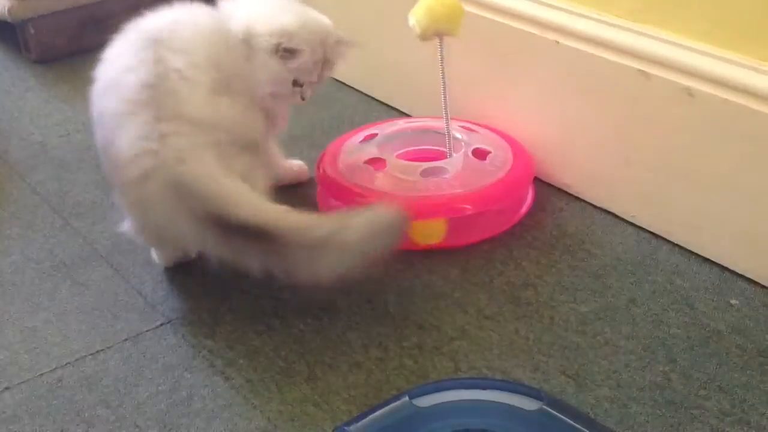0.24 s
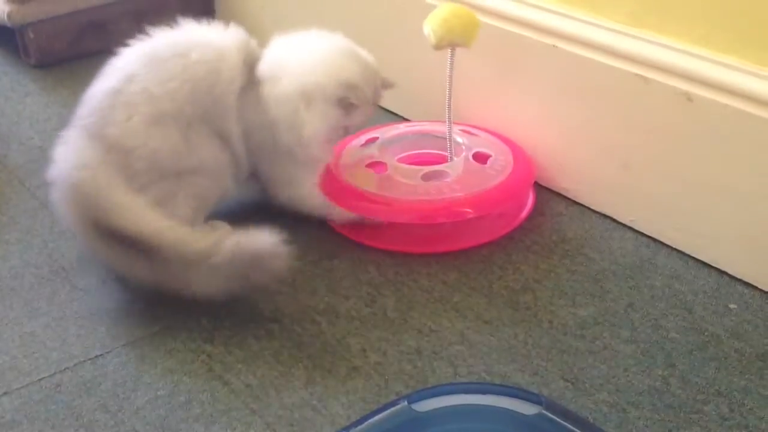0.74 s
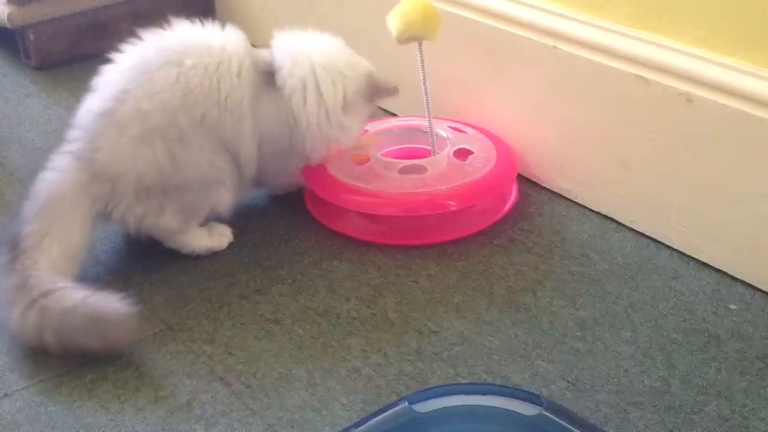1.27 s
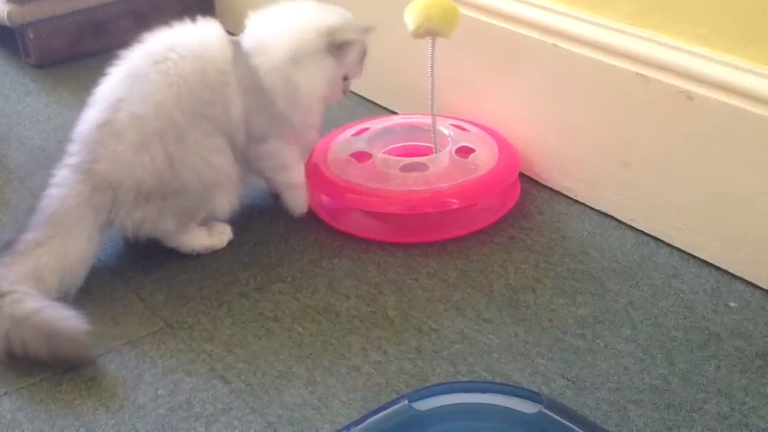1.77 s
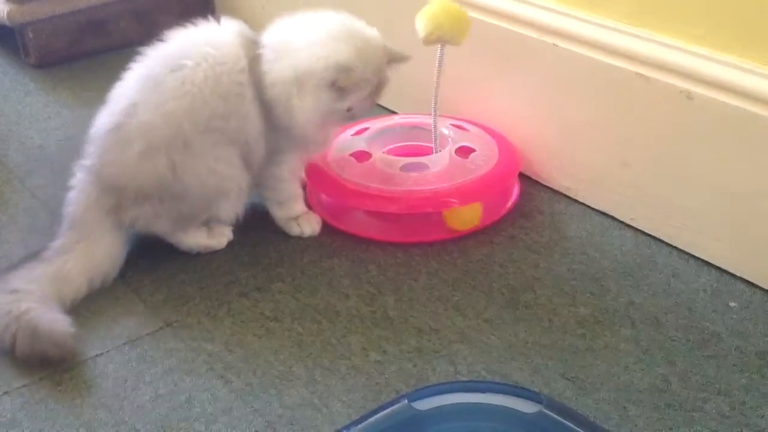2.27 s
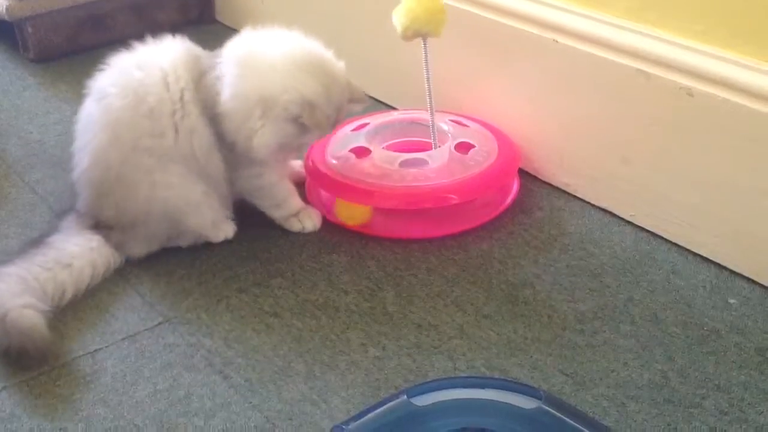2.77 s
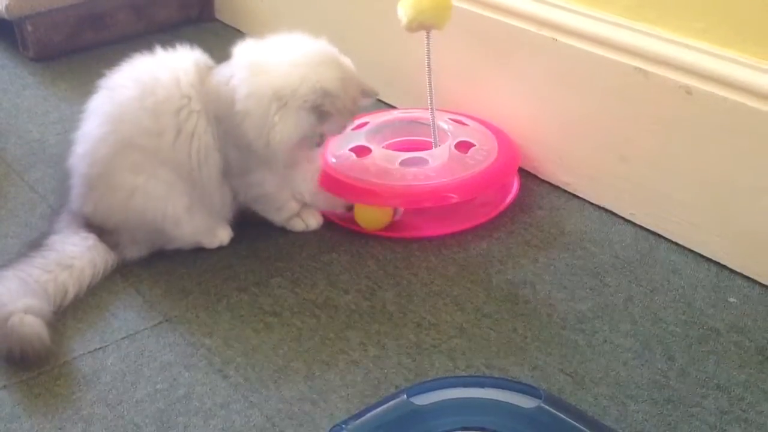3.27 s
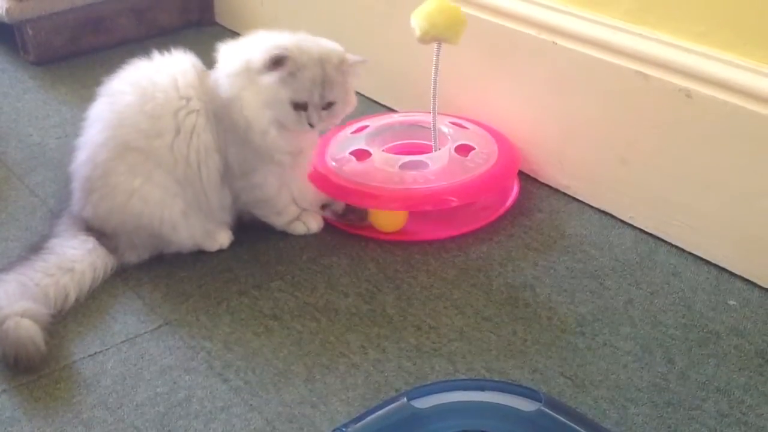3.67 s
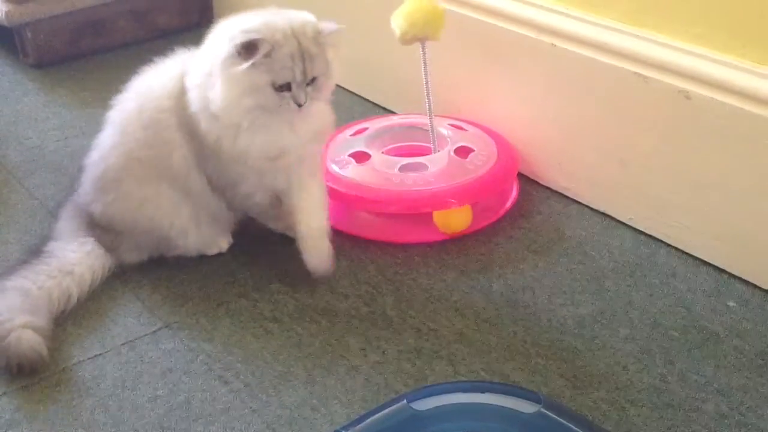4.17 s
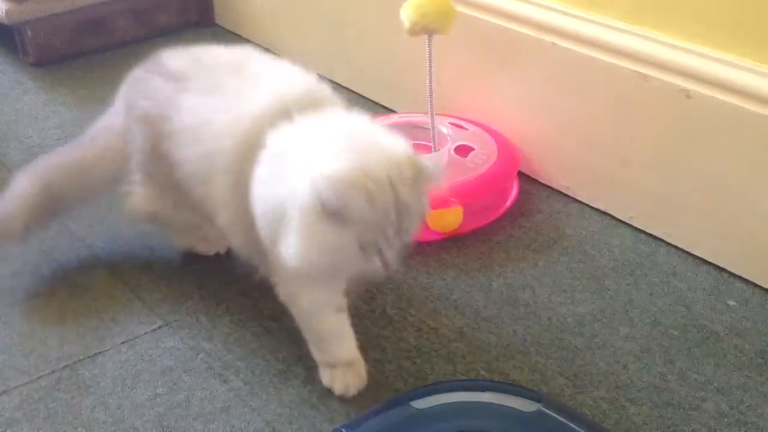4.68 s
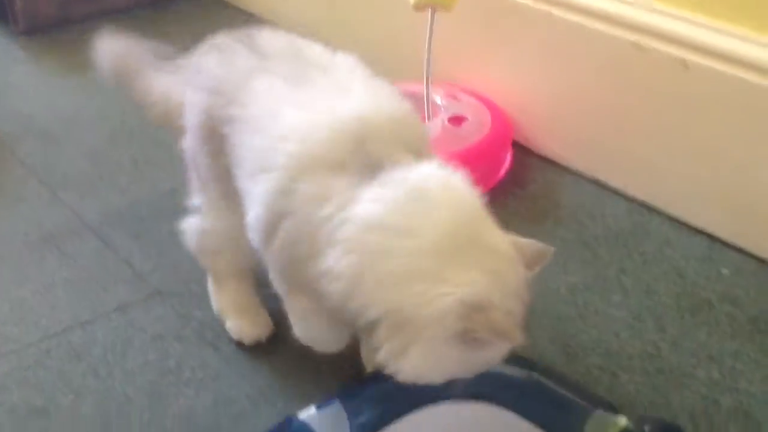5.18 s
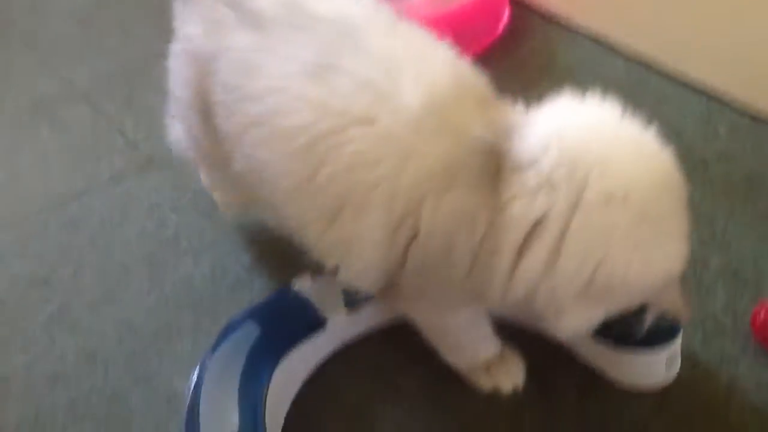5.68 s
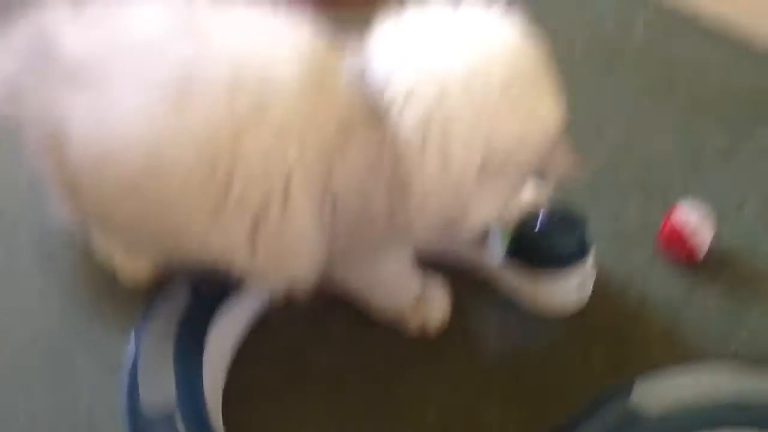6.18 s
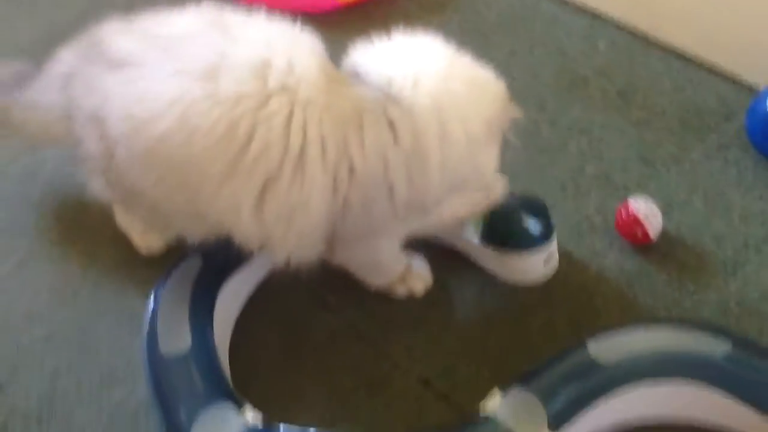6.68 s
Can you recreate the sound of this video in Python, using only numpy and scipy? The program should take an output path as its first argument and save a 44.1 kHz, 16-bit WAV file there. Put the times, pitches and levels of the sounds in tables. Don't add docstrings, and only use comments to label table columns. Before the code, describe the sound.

A small, bare, reflective room with thin carpet, heard through a handheld camera microphone with faint steady hiss. From 0 to 0.6 s a ball rolls lightly in a hollow plastic ring, ticking against its wall. At 0.7-0.9 s paw blows clatter loudly, the base thuds softly on carpet and claws scrape. Smaller knocks and short rolling bursts follow from 1.2 to 1.7 s. From 1.8 to 2.8 s the ball rolls around with quick, light bumps. Another hard clatter with scuffs comes at 3.0-3.2 s, a single knock at 3.6, then fading rolls and faint ticks. It is mostly quiet from 4.2 to 5.5 s, apart from tiny bumps near 4.6 and 4.9. A short dull finger thump lands at 5.5, a dry track tap at 5.7, then soft fur brushing and rolling around 5.9, a sharp knock at 6.44, and small taps and rolling to the end.

```python
import sys
import numpy as np
from scipy import signal
from scipy.fft import rfft, irfft, next_fast_len
from scipy.io import wavfile
from scipy.ndimage import uniform_filter1d

SR = 44100
rng = np.random.default_rng(int(sys.argv[2]) if len(sys.argv) > 2 else 0)


def output_pcm(signal):
    pcm = np.clip(np.atleast_2d(signal).T, -1, 1) * 32767
    wavfile.write(sys.argv[1], SR, np.round(pcm).astype(np.int16))


def rack_gain(trim_db):
    fader = np.asarray(trim_db, float)
    return 10 ** (fader / 20)


N = 305613

# f/Hz, level/dB, t60/s
RING_MODES = [
    [(215, 0, .13), (335, -7, .06)],
    [(505, -4, .03), (545, -2, .03), (665, -1, .028), (770, 0, .036), (860, 1, .026), (940, -1, .022),
     (1090, -2, .018), (1240, -3, .016), (1345, -4, .02)],
    [(1640, -2, .011), (1900, -1, .011), (2150, 0, .009), (2400, 0, .009), (2900, 0, .008),
     (3550, -3, .007), (4250, -8, .005)],
]
WALL_TO_BASE_DB = -25.5


def unit(x):
    return x / np.sqrt(np.mean(x ** 2) + 1e-20)


def along(points, hz):
    f, v = np.transpose(points)
    return np.interp(np.log(hz + 1), np.log(f + 1), v)


def filtered(x, response):
    m = next_fast_len(len(x) + 8192)
    hz = np.fft.rfftfreq(m, 1 / SR)
    return irfft(rfft(x, m) * response(hz), m)[:len(x)]


def causal(gain):
    cepstrum = irfft(np.log(gain + 1e-9))
    half = len(cepstrum) // 2
    cepstrum[1:half] *= 2
    cepstrum[half + 1:] = 0
    return irfft(np.exp(rfft(cepstrum)))[:half]


def swell(start, hold, db, rise, fall):
    t = np.arange(N) / SR
    before = np.maximum(start - t, 0)
    after = np.maximum(t - start - hold, 0)
    return rack_gain(db - rise * before - fall * after)


def grit(rate, spread_db):
    touch = rng.random(N) < rate / SR
    sign = np.sign(rng.standard_normal(N))
    return touch * sign * rack_gain(spread_db * rng.standard_normal(N))


def resonant(x, modes):
    def body(f):
        total = 0
        for k, (hz, db, t60) in enumerate(modes):
            mode = 1j * f * 2.2 / t60 / (hz * hz - f * f + 1j * f * 4.1 / t60)
            total = total + (-1) ** k * rack_gain(db) * mode
        return total
    return unit(filtered(x, body))


def knocks(events, body, click, gains_db, scatter_db):
    base_gain, shell_gain, upper_gain, click_gain = gains_db
    out = np.zeros(N + SR)
    f = np.fft.rfftfreq(8192, 1 / SR)
    for s, upper_db, base_db, shell_db, click_db in events:
        power = rack_gain(click_db + click_gain + along(click, f)) ** 2 * (f / (f + 1500)) ** 2
        part_levels = (base_db + base_gain, shell_db + shell_gain, upper_db + upper_gain)
        for modes, db in zip(body, part_levels):
            hz, level, t60 = np.transpose(modes)[..., None]
            level = level + rng.normal(0, scatter_db, hz.shape)
            hz = hz * (1 + 0.0072 * rng.standard_normal(hz.shape))
            skirt = 4 * f ** 2 * hz ** 2 / (f ** 2 + hz ** 2) ** 2
            width = np.hypot(2 * np.pi * (f - hz), np.log(1000) / t60)
            peak = rack_gain(db + level) * skirt * SR / 2 / width
            power += (peak ** 2).sum(0)
        blow = causal(np.sqrt(power))
        out[round(s * SR):][:len(blow)] += blow
    return out[:N]


def dispersed(x, lag):
    return filtered(x, lambda hz: np.exp(2j * np.pi * lag * (hz / 2 - 2 * np.sqrt(1e3 * hz))))


def strike_ring(rows, lag):
    # f/Hz, level/dB per Hz
    ring_click = [(1500, -7.5), (3500, 8.5), (8000, 1), (15000, -3)]
    struck = knocks(rows, RING_MODES, ring_click, gains_db=(-4, -2, -7.5, 24.0), scatter_db=3.5)
    return dispersed(struck, lag)


def scuffing(strokes, spectrum):
    grains = unit(grit(6000, spread_db=3.5)) + 0.28 * rng.standard_normal(N)
    drag = np.zeros(N)
    for s, hold, db, attack, release in strokes:
        drag += swell(s, hold, db, 20 / attack, 20 / release)
    return drag * unit(filtered(grains, lambda hz: rack_gain(along(spectrum, hz))))


def rolling():
    # t/s, shell level/dB, base over shell/dB, slowing/(dB/s)
    pushes = [(0.01, -61, 5.5, 12), (0.19, -62.5, -4, 40), (0.64, -56, -12, 150), (1.0, -50, -30, 108),
              (1.32, -50.5, 2, 90), (1.531, -46.5, -5, 44), (1.85, -56.5, 2.5, 10), (2.29, -57.5, -3, 45),
              (2.69, -57, 2.3, 30), (3.0, -63.5, 12, 100), (3.36, -55.5, -13, 158), (3.64, -55, 4, 96),
              (4.084, -69, 12.5, 92), (5.95, -48.5, -21, 98), (6.0, -66.5, 5.5, 9), (6.332, -65, 4.5, 32),
              (6.552, -56, -15, 22), (6.92, -55, -25, 20.5)]
    # f/Hz, level/dB, t60/s
    tunnel = [
        (783, 0, 0.012),
    ]
    # f/Hz, level/dB, t60/s
    carpet = [
        (420, 0, 0.02),
    ]
    spin_up = 118
    speed = np.array([swell(s, 0, db, spin_up, abs(slowing)) for s, db, _, slowing in pushes])
    base_share = rack_gain([[row[2]] for row in pushes])
    shell = speed.max(0)
    base = (speed * base_share).max(0)
    contacts = grit(1500, spread_db=1.0)
    hollow = rack_gain(-9.5) * resonant(contacts, RING_MODES[1])
    hollow += rack_gain(-14) * resonant(contacts, carpet)
    hollow += rack_gain(-13) * resonant(contacts, tunnel)
    rumble = resonant(grit(500, spread_db=-4.5), RING_MODES[0])
    return shell * hollow + rack_gain(-5.5) * base * rumble


def wall_bumps():
    # t/s, shell level/dB, hardness/dB
    bumps = [(0.0195, -55.5, -3), (0.143, -44.5, 0), (0.1714, -63, 15), (0.2886, -54.5, -5),
             (0.3884, -57, -12), (0.5508, -52.5, -4), (0.5846, -49.5, 1), (0.6124, -53, 5),
             (1.8307, -46, 1.5), (1.947, -44.5, 1.5), (2.0245, -56, 6), (2.0484, -47.5, -2),
             (2.16, -50.5, -12), (2.1917, -50.5, 4), (2.2428, -49, -2), (2.3436, -43, 4.5),
             (2.4537, -52.5, -8), (2.5405, -55.5, -23.5), (2.6013, -53, -7), (2.656, -49.5, -3),
             (2.7224, -48, -2.2), (2.7616, -48, 5), (2.8112, -55, -12), (3.8684, -55.5, -15),
             (3.922, -50, -18), (4.5725, -60.5, -3), (4.9182, -48.5, -16), (4.9327, -58.5, 13)]
    rows = []
    for s, db, hard in bumps:
        click_db = db - 14.5 + 0.36 * hard
        rows.append((s, db + hard, db + WALL_TO_BASE_DB, db, click_db))
    return strike_ring(rows, lag=0.003)


def base_landings():
    # t/s, base level/dB
    landings = [(0.143, -44), (0.1723, -43), (0.288, -41.5), (0.5832, -49), (0.6873, -31.5), (0.7074, -39),
                (0.7233, -43), (0.757, -61), (0.816, -38), (0.8591, -26), (0.8867, -32), (1.175, -43.5),
                (1.2094, -36.5), (1.3042, -49), (1.6629, -34), (1.947, -62), (2.192, -45), (2.655, -52.5),
                (2.762, -46), (2.811, -49), (3.0444, -35.5), (3.0563, -37), (3.1101, -35), (3.1353, -41),
                (3.197, -28), (3.2142, -37), (3.5958, -36), (3.92, -56), (4.5716, -53), (4.9332, -45.5)]
    rows = [(s, db - 60, db, db - 15.5, db - 60) for s, db in landings]
    return strike_ring(rows, lag=0.003)


def carpet_scuffs():
    # t/s, hold/s, level/dB, attack/s, release/s
    strokes = [
        (.662, .012, -40.5, 0.012, .05),
        (.79, .03, -57, .1, .1),
        (0.901, .005, -42, 0.085, 0.023),
        (1.227, 0.058, -52.5, 0.12, 0.1),
        (1.423, .005, -54, 0.02, 0.12),
        (1.596, .005, -74, .2, .01),
        (3.02, 0.025, -44, 0.014, 0.025),
        (3.184, 0.029, -44.5, 0.057, 0.12),
    ]
    # f/Hz, level/dB per Hz
    nap = [(300, -7), (600, -8), (1200, -6), (2500, -6.5), (4500, -9.5), (8000, -12.5), (13000, -13),
           (16000, -22)]
    return scuffing(strokes, nap)


def paw_blows():
    # t/s, shell level/dB, upper modes over shell/dB, click over shell/dB
    blows = [(0.686, -23.5, 5, -13.5), (0.7063, -36.5, -6, -2.5), (0.7226, -45, 18.5, 3),
             (0.7454, -34, 3, -0.5), (0.7554, -44, 15, 2.5), (0.8192, -23.5, -1.5, -20),
             (0.8501, -27.5, -9, -14), (0.8598, -30, -19, 4), (0.8697, -35, 10, -22),
             (1.1755, -36.5, 8, -1.8), (1.2094, -48.5, 2, -4), (1.2572, -44, -9, 5.5),
             (1.304, -37, 3.5, -11), (1.4094, -66.5, -5, 16.5), (1.4782, -35, 6.5, -10),
             (1.6321, -45.5, -4, -28), (1.6629, -43.5, -3, -19), (1.6933, -43.5, 3, -22),
             (3.0449, -24, 0.5, -10), (3.0568, -42, -5, -24), (3.0921, -32, 5.5, -6.5),
             (3.1104, -31, -4, -11.5), (3.1357, -35.5, -8, -22), (3.1986, -31.5, -9, 1),
             (3.2154, -50, 17, 9), (3.5967, -35.5, 4, -7.5), (4.1155, -53, 3.5, -3)]
    rows = [(s, db + upper, db + WALL_TO_BASE_DB, db, db + click) for s, db, upper, click in blows]
    return strike_ring(rows, lag=0.000983)


def dull_thumps():
    # t/s, level/dB, f/Hz, t60/s
    thumps = [
        (4.16, -53, 75, .2),
        (5.5042, -27, 240, .027),
        (5.6, -52, 70, .15),
    ]
    out = np.zeros(N)
    for s, db, hz, t60 in thumps:
        t = np.maximum(np.arange(N) / SR - s, 0)
        push = np.sin(2 * np.pi * hz * t) + 0.25 * np.sin(2 * np.pi * 2.56 * hz * t)
        soft_noise = uniform_filter1d(rng.standard_normal(N), size=9)
        tick = rack_gain(2 * db + 12 - 60 * t / .012) * soft_noise * (t > 0)
        out += rack_gain(db - 60 * t / t60) * push * (1 - np.exp(-t * hz)) + tick
    return out


def fur_brushes():
    # t/s, hold/s, level/dB, attack/s, release/s
    brushes = [
        (5.294, 0.21, -64.5, 0.026, 0.28),
        (5.905, 0.15, -53, 0.27, 0.063),
        (6.204, .005, -58, 0.51, 0.32),
        (6.7, .005, -60, 0.12, 0.41),
    ]
    # f/Hz, level/dB per Hz
    fur = [(300, 1), (1200, -2.5), (2500, -6.5), (4500, -9.5), (8000, -11), (14000, -12.5), (16000, -22)]
    return scuffing(brushes, fur)


def track_knocks():
    # t/s, upper modes/dB, base/dB, shell/dB, click/dB
    taps = [(5.7195, -31.5, -46.5, -35.5, -49), (5.9435, -38, -64, -34.5, -53),
            (6.2161, -48, -75, -57, -73), (6.3141, -73, -59, -51, -80), (6.33, -42, -55, -40.5, -84),
            (6.4422, -18, -48.5, -33, -35.5), (6.471, -42, -77, -43, -69), (6.6421, -39.5, -54.5, -45, -62),
            (6.7605, -33.5, -47, -46, -52), (6.7715, -48, -57, -40.5, -48), (6.8094, -59, -74, -47, -82)]
    # f/Hz, level/dB, t60/s
    track_modes = [
        [(226, 0, .09), (340, -4, .05)],
        [(470, 0, .022), (660, -4, .016), (900, 0, .014), (1160, 0, .014)],
        [(1345, -3, .02), (1480, -5, .014), (1650, 0, .028), (1890, -1, .026), (2130, -4, .014),
         (2780, -6, .008), (3670, -10, .008)],
    ]
    # f/Hz, level/dB per Hz
    dull_click = [(1500, 3), (2800, 13), (4000, 9), (6200, 0), (7500, -8), (15000, -18)]
    struck = knocks(taps, track_modes, dull_click, gains_db=(3.5, -2, -9.5, 25.0), scatter_db=2.5)
    return dispersed(struck, lag=0.002503)


def room(x, gap=0.0025, near_db=-3, near_t60=0.022):
    # f/Hz, t60/s
    decay = [(150, 0.76), (400, 0.45), (1000, 0.43), (3000, 0.42), (8000, 0.41), (15000, 0.2)]
    out = np.zeros(N + 2 * SR)
    step = SR // 8
    for start in range(0, N, step):
        hz, t, z = signal.stft(rng.standard_normal(SR * 5 // 8), SR, nperseg=256)
        fading = z * rack_gain(-60 * t / along(decay, hz)[:, None])
        tail = signal.istft(fading, SR, nperseg=256)[1]
        age = np.arange(len(tail)) / SR
        tail *= np.clip(age / gap, 0, 1) ** 2
        near = rng.standard_normal(len(tail)) * rack_gain(-60 * age / near_t60)
        answer = tail / np.linalg.norm(tail) + rack_gain(near_db) * near / np.linalg.norm(near)
        wet = signal.fftconvolve(x[start:start + step], answer)
        out[start:start + len(wet)] += wet
    return out[:N]


def scene():
    drag = rolling() + carpet_scuffs()
    bumps = wall_bumps() + base_landings()
    blows = paw_blows()
    track = track_knocks()
    direct = rack_gain(-7.0) * blows + rack_gain(-5.5) * bumps + rack_gain(-8.5) * drag + rack_gain(-.4) * track
    reflected = room(blows + bumps + drag + track)
    return (direct + reflected + dull_thumps() + fur_brushes())[None]


def roll_off(x):
    return signal.sosfilt(signal.butter(12, 16460, fs=SR, output="sos"), x)


def record(dry):
    # f/Hz, level/dB per Hz
    hiss_colour = [(22, -31), (54, -28), (155, 0), (238, 1.5), (470, -8.5), (2390, -15.5), (12600, -17),
                   (15200, -21)]
    cut = filtered(dry[0], lambda hz: (1j * hz / (1j * hz + 90)) ** 3)
    rounded = cut / (1 + np.abs(cut / .19) ** 3) ** (1 / 3)
    hiss = unit(filtered(rng.standard_normal(N), lambda hz: rack_gain(along(hiss_colour, hz))))
    heard = filtered(rounded + rack_gain(-63) * hiss, lambda hz: hz < 15500)
    return roll_off(heard[None])


dry = scene()
out = record(dry)
output_pcm(out)
```